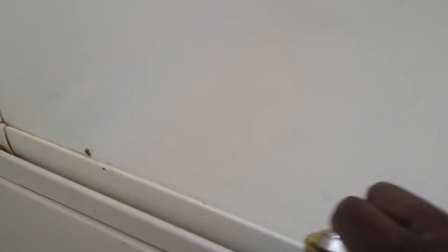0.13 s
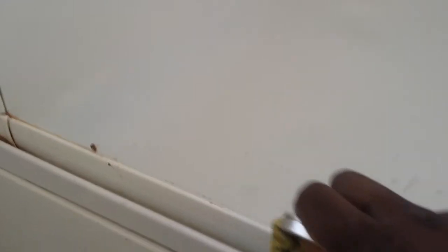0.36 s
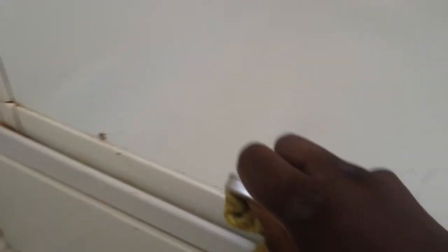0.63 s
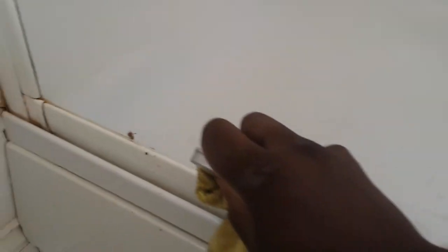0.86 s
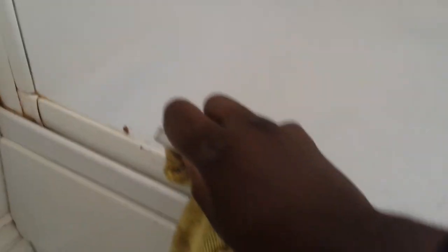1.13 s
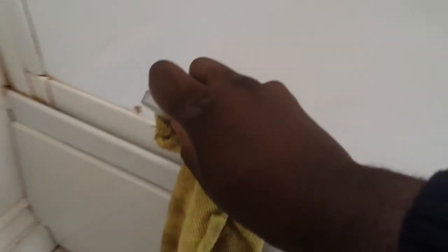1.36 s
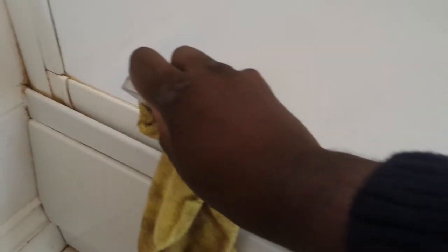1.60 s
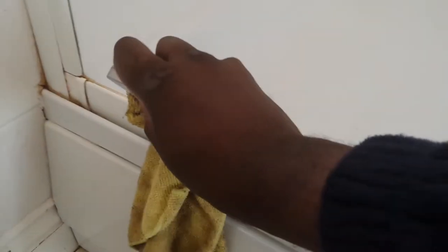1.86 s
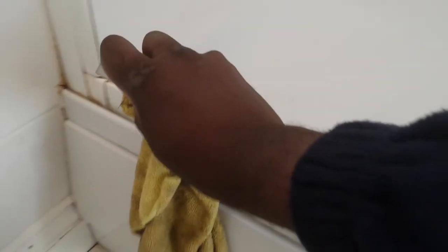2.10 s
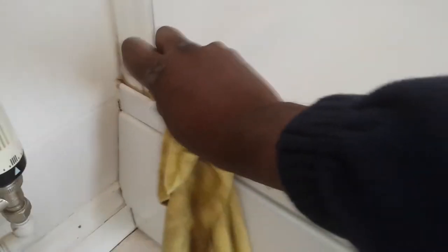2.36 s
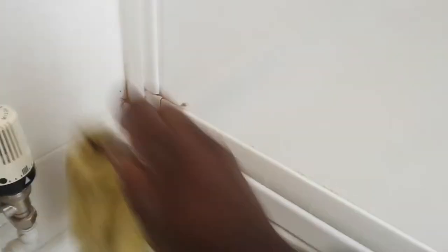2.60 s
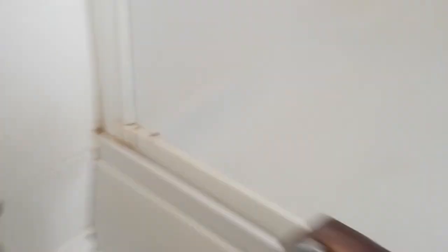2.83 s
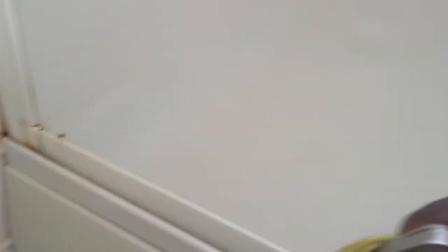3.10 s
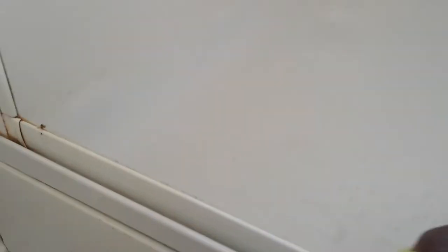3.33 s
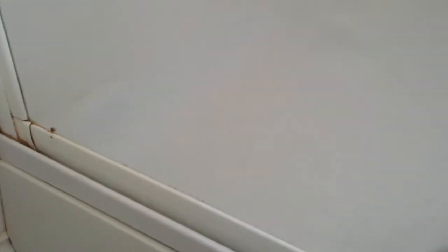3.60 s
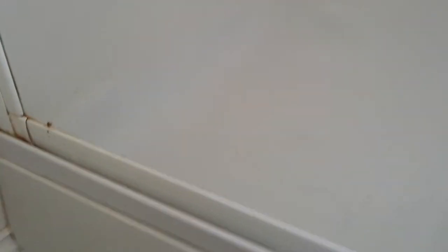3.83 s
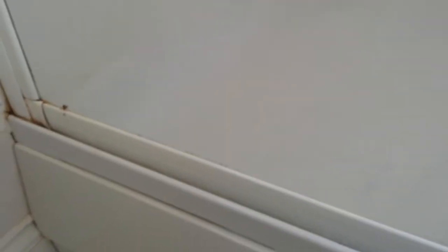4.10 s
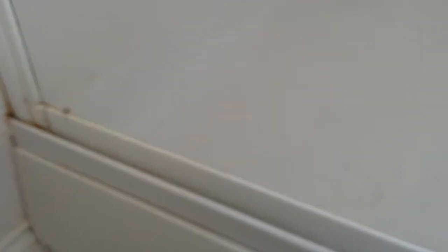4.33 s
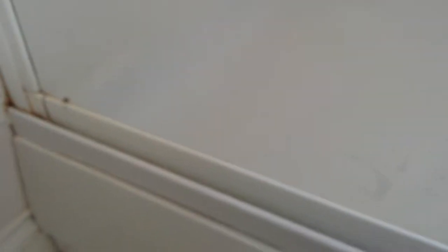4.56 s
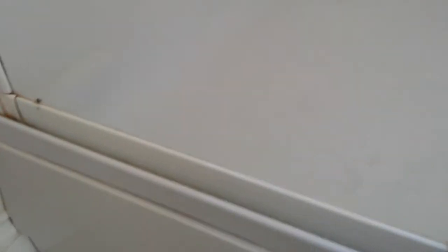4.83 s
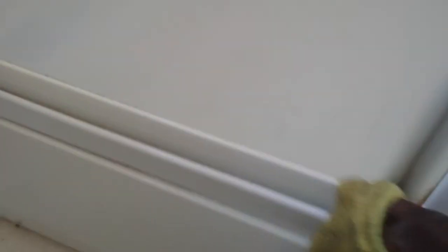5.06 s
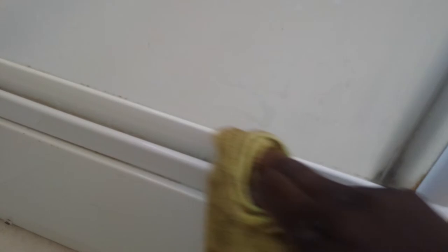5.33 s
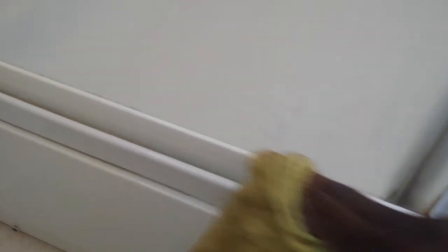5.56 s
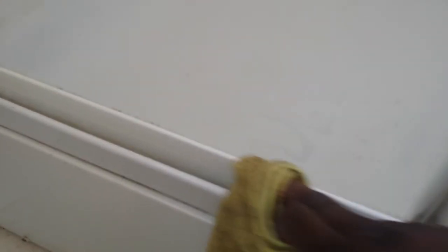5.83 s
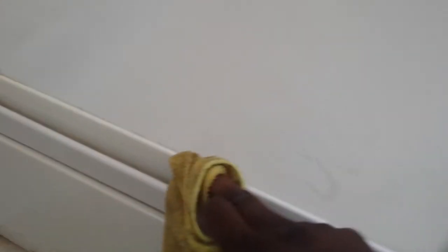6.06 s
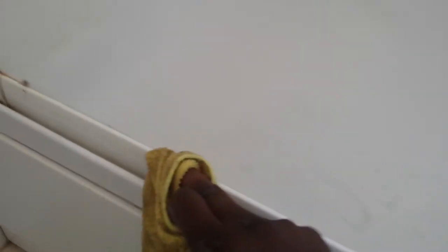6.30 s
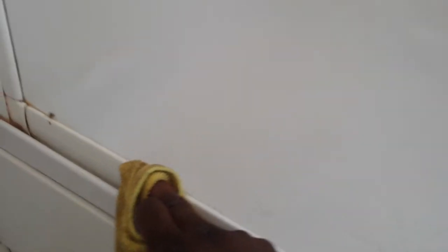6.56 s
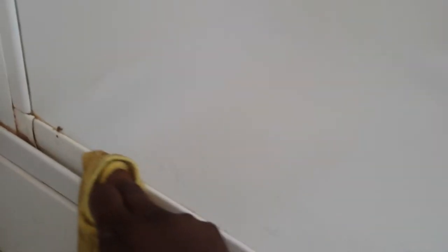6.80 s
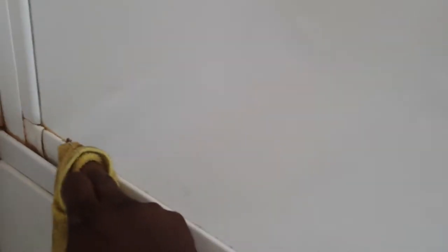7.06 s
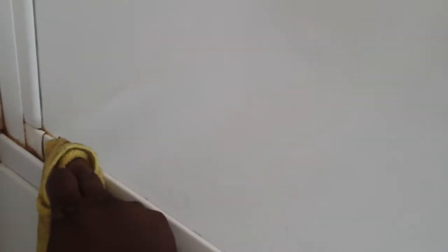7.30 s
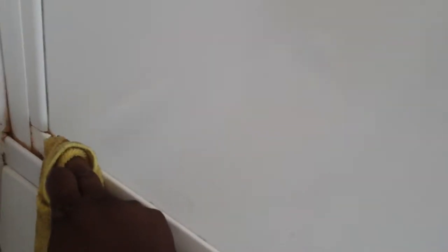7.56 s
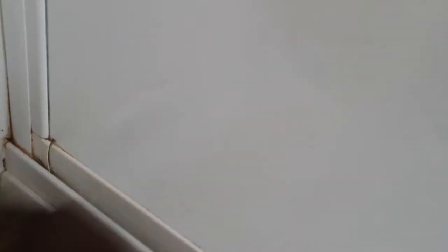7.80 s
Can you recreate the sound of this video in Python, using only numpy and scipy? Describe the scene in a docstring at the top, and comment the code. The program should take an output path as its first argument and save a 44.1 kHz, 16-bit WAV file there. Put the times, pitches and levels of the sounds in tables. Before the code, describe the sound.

A close stereo pickup in a small, quiet tiled bathroom with a faint bassy room bed. From 0 to 2.4 s a damp cloth around a hard tool drags along a hollow plastic rim: dry fibre hiss, soft rasp and uneven low judder, with small dull knocks near 0.9, 1.9 and 2.2 s. The rasp swells, and at 2.43 s the cloth slams off the corner with a loud clack and booming thuds until about 2.55 s. A brief squeak and loose cloth rustles follow, with a small dry tick near 3.35 s. At 4.23 s the bare tool falls, cracking sharply and bouncing brightly until 4.5 s, with short echoes. Quiet rustling leads to a second stroke from 5.8 to 7.2 s, finger-pressed, raspy and juddering, with faint high squeaks around 6.1 to 6.9 s. A muffled knock lands at 7.45 s, then light rustling and a faint low bump.

```python
"""A low judder, a rasp and a fibre hiss: a hand drags a damp cloth, wrapped round a small hard tool,
along the plastic rim of a shower tray. Uneven slips push the hollow tray; shaped noise rings rim and tool.
Knocks are bursts of noise over soft thuds; the bare tool falls and bounces, then a finger rubs the cloth.
Faint squeaks whistle, loose cloth rustles, and sparse echoes of a small tiled bathroom ring on.
Two microphone ports of unlike colour stand close by."""
import sys
import numpy as np
from scipy import signal
from scipy.fft import rfft, irfft
from scipy.io import wavfile
from scipy.ndimage import uniform_filter1d

SR = 44100
rng = np.random.default_rng(int(sys.argv[2]) if len(sys.argv) > 2 else 0)


def transcribe(u):
    """Save the signal u as a 16-bit wav file named by the first command-line argument.

    u: samples, shape (n,) or (channels, n), limited to [-1, 1]; the rate is SR.
    q: integer samples, one column per channel.
    """
    v = np.clip(np.atleast_2d(u).T, -1, 1)
    q = np.round(v * 32767).astype(np.int16)
    wavfile.write(sys.argv[1], SR, q)


def volts_from_db(level):
    """Convert decibel levels to linear amplitude ratios."""
    exponent = np.asarray(level, float) / 20
    return 10 ** exponent


N = 349272  # length [samples]

# modes of the hollow tray: (frequency [Hz], relative level [dB], t60 [s])
TRAY_MODES = [(50, -5.5, 0.6), (80, -3.5, 0.1), (120.7, 2, 0.31), (160, 2.5, 0.063), (204, 3, 0.085),
              (248, 0.5, 0.083), (289.6, -1, 0.13), (318, 0.5, 0.13), (362, 0.5, .09), (440, -1, 0.057)]
# modes of the plastic rim: (frequency [Hz], relative level [dB], t60 [s])
RIM_MODES = [(1262, 3, .12), (2320, 0, .055), (2440, -2, .055), (445, -2, .05), (490, -5, .05),
             (560, -2, .05), (636, -3, .05), (712, 2, .08), (850, -8, .03), (1500, -2, .04),
             (1900, -2, .03), (2130, -4, .04), (1680, -3, .04), (2640, 0, .04), (2850, 0, .04),
             (3100, 1, .04)]
# modes of the hard tool: (frequency [Hz], relative level [dB], t60 [s])
TOOL_MODES = [(4980, 3, .035), (5830, -7.5, .025), (5900, -8.5, .03), (6000, -2.5, 0.035), (6125, -3, .045),
              (6400, -3.5, .025), (6440, -0.5, .025), (6625, -2, .03), (6960, -4, .02), (6750, -2, .015),
              (7410, -2.5, .02), (7420, -1.5, .02), (7500, -2, .02), (8050, -2.5, 0.022), (8300, 3, 0.035),
              (8980, -10, 0.016), (9630, -7.5, .012)]
MUFFLED, BARE = 0.078, 1  # hardness 0-1 of a muffled blow, and of the bare tool


def evened(x):
    """Scales to rms 1."""
    return x / np.sqrt(np.mean(abs(x) ** 2) + 1e-20)


def peaked(x):
    """Scales to peak 1."""
    return x / abs(x).max()


def read(points, hz):
    """Reads a table on a log-frequency axis."""
    f, value = np.transpose(points)
    return np.interp(np.log(hz + 1), np.log(f + 1), value)


def add(mix, s, sound):
    """Mixes a sound in at time s."""
    part = mix[..., round(s * SR):][..., :sound.shape[-1]]
    part += sound[..., :part.shape[-1]]


def follow(table):
    """Gains of the dB columns of a curve, sample by sample; all but silent outside it."""
    s, *columns = np.transpose(table)
    return volts_from_db([np.interp(np.arange(N) / SR, s, c, -120, -120) for c in columns])


def wander(seconds):
    """Random drift of rms 1, smoothed over the given time."""
    span = round(seconds * SR)
    return evened(uniform_filter1d(uniform_filter1d(rng.standard_normal(N), span), span))


def resonate(x, hz, width):
    """A moving resonance of gain 1: shift down, smooth, shift back."""
    turn = np.exp(2j * np.pi * np.cumsum(hz * np.ones(len(x))) / SR)
    r = np.exp(-np.pi * width / SR)
    return 2 * (turn * signal.lfilter([1 - r], [1, -r], x / turn + 1e-18)).real


def resonate_twice(x, hz, width, second_width):
    """Two resonances in a row at one pitch give steeper skirts."""
    return resonate(resonate(x, hz, width), hz, second_width)


def ringing(modes, seconds, centre_hz, db_per_octave):
    """Answer of a body to one click; modes far from the centre of the blow are weaker."""
    t = np.arange(round(seconds * SR)) / SR
    hz, db, t60 = np.transpose(modes)[:, :, None]
    db = db - db_per_octave * abs(np.log2(hz / centre_hz))
    return (volts_from_db(db - 60 * t / t60) * np.sin(2 * np.pi * hz * t)).sum(0)


def tinted(x, modes, centre_hz, share):
    """Adds the share of a rubbing noise that rings a body."""
    body = ringing(modes, 0.33, centre_hz, 1.9)[None]
    return evened(x + share * evened(signal.oaconvolve(x, body, axes=1)[:, :N]))


def paired(a, b, hz):
    """Left and right spectra: alike in the bass, unrelated in the treble."""
    # diffuse sound: (frequency [Hz], left-right likeness [-1 to 1])
    likeness = [(60, 0.97), (150, 0.94), (380, 0.86), (940, 0.33), (2360, -0.02), (5910, 0.04),
                (14800, -0.01)]
    same = np.clip(read(likeness, hz), -1, 1)
    return np.array([a, same * a + np.sqrt(1 - same ** 2) * b])


def noise(spectra, patchy_db, flicker_db):
    """Diffuse two-channel noise with drifting patches and a shared flicker; its colour changes with the grip."""
    regrip_s = 4.2  # the tool is dropped; from here a finger presses the cloth
    frames, hz = N // 128 + 5, np.fft.rfftfreq(512, 1 / SR)
    a, b, c, d, patches = rng.standard_normal((5, frames, 257))
    patches = evened(uniform_filter1d(uniform_filter1d(patches, size=20, axis=0), size=7, axis=1))
    flicker = evened(uniform_filter1d(rng.standard_normal(frames), size=5))[:, None]
    tool, finger = (evened(volts_from_db(read(spectrum, hz))) for spectrum in spectra)
    colour = np.where(np.arange(frames)[:, None] * 128 / SR < regrip_s, tool, finger)
    z = paired(a + 1j * b, c + 1j * d, hz) * colour
    z = z * volts_from_db(patchy_db * patches + flicker_db * flicker)
    return evened(signal.istft(z, nperseg=512, noverlap=384, time_axis=1, freq_axis=2)[1][:, :N])


def still_room():
    """The quiet bed of the room: steady diffuse noise, strongest in the bass."""
    # colour of the still room: (frequency [Hz], density [dB per Hz])
    bed = [(15, -44.5), (25, 10), (159, -10.5), (577, -18), (678, -15.5), (796, -17), (1830, -24.5),
           (2040, -25), (3000, -20), (5210, -26), (10000, -40), (15200, -44)]
    return volts_from_db(-64.5) * noise((bed, bed), 0.84, .6)


def tiles(x):
    """Sparse echoes of random sign off the tiles, each band dying at its own speed."""
    # decay of the bathroom: (frequency [Hz], t60 [s])
    decay = [(80, 0.59), (260, 0.38), (700, 0.52), (1800, 0.41), (3200, 0.4), (6000, 0.33), (12000, 0.23)]
    taps = np.zeros((2, SR))
    at = np.arange(130, SR - 20, 20) + rng.integers(0, 20, (2, (SR - 131) // 20))
    np.put_along_axis(taps, at, rng.choice([-1., 1.], at.shape), 1)
    hz, t, z = signal.stft(taps, SR, nperseg=256)
    dying = volts_from_db(-60 * t / read(decay, hz)[:, None])
    tail = signal.istft(z * dying, SR, nperseg=256)[1][:, :SR]
    hz = np.fft.rfftfreq(SR, 1 / SR)
    bass_cut = np.hypot(1, (140 / (hz + 1)) ** 2)  # echoes thin in the bass; the tray carries the deep ring
    tail = irfft(paired(*rfft(tail), hz) / bass_cut)
    return signal.fftconvolve(x[None], tail / np.linalg.norm(tail[0]), axes=1)[:, :N]


def room(x):
    """Three sets of echo paths take turns, so the echoes stay varied and smooth."""
    turns_hz, echo_db = 3, -6.5
    turn = 2 * np.pi * turns_hz * np.arange(N) / SR
    paths = (tiles(x * np.sqrt(2 / 3) * np.cos(turn + 2 * np.pi * k / 3)) for k in range(3))
    return volts_from_db(echo_db) * sum(paths)


def squeak(seconds, hz, db):
    """A fuzzy, wavering whistle: noise through a narrow resonance that sinks a little."""
    sag, waver_share, width_hz = .02, .006, 200  # sag and waver are shares of the pitch
    n = round(seconds * SR)
    drive = rng.standard_normal((2, n))
    waver = evened(uniform_filter1d(rng.standard_normal(n), size=1500))
    hz = hz * (1 + waver_share * waver + sag * np.linspace(.5, -.5, n))
    whistle = evened(np.array([resonate_twice(d, hz, width_hz, 2 * width_hz) for d in drive]))
    return volts_from_db(db) * whistle * signal.windows.tukey(n, .6)


def squeaks():
    """Faint squeaks of damp cloth, each a whistle of its own pitch."""
    # whistles: (start [s], end [s], pitch [Hz], level [dB])
    whistles = [(2.674, 2.796, 5570, -53), (3.622, 3.68, 6200, -68), (6.06, 6.168, 7950, -63),
                (6.067, 6.415, 5650, -60), (6.246, 6.32, 7950, -60), (6.496, 6.62, 5600, -56),
                (6.553, 6.614, 7100, -52.5), (6.702, 6.924, 8300, -58), (6.705, 6.8, 5700, -52)]
    mix = np.zeros((2, N))
    for start, end, hz, db in whistles:
        add(mix, start, squeak(end - start, hz, db))
    return mix


def thud(db, hz, length, rung):
    """A soft push, its length in cycles, sets the tray booming by the share rung."""
    cycles = hz * np.arange(SR // 4) / SR
    push = -np.sin(2 * np.pi * cycles) * cycles * np.exp(-cycles / length)
    push = peaked(resonate_twice(push, hz, 1.5 * hz, 1.5 * hz))
    boom = signal.fftconvolve(push, ringing(TRAY_MODES, .4, hz, 6.0))[:len(push)]
    fade = signal.windows.tukey(2 * len(push), .3)[len(push):]
    return volts_from_db(db) * (push + rung * peaked(boom)) * fade


def bumps():
    """Dull, short low bumps on the tray, some under the falling tool."""
    # soft blows: (time [s], level [dB], centre [Hz])
    soft_blows = [(1.165, -21, 73.7), (2.486, -19, 129.4), (2.521, -18.5, 59.5), (2.538, -33, 117),
                  (2.715, -33.5, 323), (4.24, -19, 255), (4.32, -26.5, 352), (7.835, -36, 136),
                  (7.872, -55, 116), (7.9, -43, 109.5)]
    mix = np.zeros((2, N))
    for s, db, hz in soft_blows:
        add(mix, s, thud(db, hz, 0.88, 0.18))
    return mix


def clatter(modes, centre_hz, width, top, seconds, rung, db_per_octave):
    """Some ms of chatter give a broad band round the centre and ring the modes."""
    rise_share = .3  # share of the chatter in which it grows
    mode_scatter = .006  # each blow lands elsewhere and shifts the modes by about this share
    t = np.arange(SR // 4) / SR
    swell = np.exp(-(t / seconds) ** 2) * np.minimum(t / (rise_share * seconds), 1)
    chatter = rng.standard_normal((2, len(t))) * swell
    chatter = irfft(paired(*rfft(chatter), np.fft.rfftfreq(len(t), 1 / SR)), len(t))
    for _ in range(2):  # flatten the spectrum of the chatter so that every mode rings steadily
        z = rfft(chatter)
        chatter = irfft(z / abs(z), len(t)) * np.exp(-(t / (1.5 * seconds)) ** 4)
    width_hz = width * centre_hz
    band = [resonate_twice(c, centre_hz, width_hz, width_hz) for c in chatter]
    broad = np.array([resonate(b, centre_hz, 2 * width_hz) for b in band])
    broad = signal.lfilter(*signal.butter(2, 0.17 * centre_hz, "high", fs=SR), broad)
    broad = signal.lfilter(*signal.butter(2, min(top * centre_hz, SR / 2.1), fs=SR), broad)
    modes = np.array(modes) * (1 + mode_scatter * rng.standard_normal((len(modes), 1)) * [1, 0, 0])
    body = ringing(modes, 0.215, centre_hz, db_per_octave)[None]
    ring = signal.fftconvolve(chatter, body, axes=1)[:, :len(t)]
    sound = evened(broad) + rung * evened(ring)
    return evened(sound) * np.sqrt(seconds / t[-1] / 8)  # energy of a burst whose peak is near 1


def knock(hardness, chatter_ms, crack_db, crack_hz, clack_db, clack_hz, thud_db, thud_hz):
    """Chatter gives a high crack and a lower clack of the rim, ringing more when hard, over a thud."""
    # modes of a muffled crack: (frequency [Hz], relative level [dB], t60 [s])
    muffled_modes = [(4900, -6, 0.017), (5450, -1, .014), (6500, -4, .01)]
    seconds = chatter_ms / 1000
    crack_modes = TOOL_MODES if hardness > .5 else muffled_modes
    crack_ring, rim_ring = 0.68 + 1.2 * hardness, 0.39 + 0.75 * hardness
    crack = clatter(crack_modes, crack_hz, 2.0, 1.9, seconds, crack_ring, 17)
    clack = clatter(RIM_MODES, clack_hz, 1.1, 1.2, 1.1 * seconds, rim_ring, 26)
    return volts_from_db(crack_db) * crack + volts_from_db(clack_db) * clack + thud(thud_db, thud_hz, 0.51, 0.58)


def dry_tick():
    """One short, dry tick close to the microphone, sent to no echoes."""
    # (time [s], chatter [ms], crack level [dB], crack centre [Hz], clack level [dB], clack centre [Hz],
    # thud level [dB], thud centre [Hz])
    tick = (3.3475, 2, -34.5, 6300, -29, 2200, -48, 161)
    mix = np.zeros((2, N))
    add(mix, tick[0], knock(MUFFLED, *tick[1:]))
    return mix


def knocks():
    """Knocks on the rim: muffled ones of hand or wrapped tool, ringing off-centre ones as the tool falls bare."""
    # (time [s], chatter [ms], crack level [dB], crack centre [Hz], clack level [dB], clack centre [Hz],
    # thud level [dB], thud centre [Hz])
    blows = [(0.9341, 5.4, -48, 5200, -29, 2400, -37, 413), (0.944, 7.4, -48, 5200, -31.5, 1100, -34, 400),
             (1.859, 5, -35.5, 5200, -35, 1210, -46, 106), (2.219, 4.2, -28.5, 5200, -44, 600, -36.5, 139),
             (2.359, 9.3, -29, 5200, -40, 1660, -29, 200), (2.421, 11, -46, 5200, -27, 900, -27, 250),
             (2.4304, 6.8, -9, 5500, -10.5, 1880, -17, 141),
             (2.441, 10.5, -25, 5300, -15.5, 1920, -26, 250),
             (2.455, 10.4, -32.5, 5200, -20, 1900, -13.5, 315),
             (2.519, 13, -35.5, 5400, -24, 2000, -37, 250), (2.555, 9.8, -39.5, 5400, -35, 2012, -36, 250),
             (2.623, 6, -41.5, 5300, -42, 2000, -44, 252), (2.764, 4.9, -57, 5200, -32.5, 850, -43, 115),
             (2.795, 3.5, -44.5, 5200, -38, 1610, -44, 128), (3.556, 5.2, -54.5, 6200, -65, 2500, -49, 89),
             (4.148, 4.9, -51, 6800, -56.5, 2130, -57, 159),
             (4.2303, 7.2, -3, 7300, -12, 591.6, -18.5, 176),
             (4.2498, 2.8, -18.5, 8200, -21, 2204, -20, 267),
             (4.257, 6, -26.5, 6200, -22.5, 640, -24.5, 200), (4.281, 5.4, -5.5, 6300, -21, 2600, -36, 160),
             (4.305, 7.2, -30.5, 6000, -20.5, 2600, -37.5, 153),
             (4.401, 7.2, -35.5, 6800, -52, 2410, -44, 220),
             (4.4475, 6.7, -12.5, 7000, -9.5, 1280, -30.5, 160),
             (4.4722, 3.64, -4.5, 7000, -10.5, 2700, -36.5, 402),
             (4.5, 9.9, -26, 6000, -21, 1400, -33, 278), (7.452, 6.3, -36, 4900, -24, 2350, -31.5, 290),
             (7.472, 5, -47, 4900, -32, 1190, -35, 280)]
    drop_start_s, drop_end_s = 4.2, 4.51  # the bare tool falls and bounces
    drop_pan_db = -2  # left against right
    mix = np.zeros((2, N))
    for s, *blow in blows:
        falling = drop_start_s < s < drop_end_s
        pan = volts_from_db(falling * drop_pan_db * np.c_[[.5, -.5]])
        add(mix, s, knock(BARE if falling else MUFFLED, *blow) * pan)
    return mix


def rustling():
    """Rasp, hiss and rumble gains of the loose cloth brushing past: each rustle swells, peaks and fades."""
    # (start [s], length [s], rasp level [dB], fibre hiss level [dB], rumble level [dB],
    # place of the peak [share of the length])
    brushes = [(2.653, 0.2, -59, -57.5, -59, 0.32), (2.839, 0.63, -53, -53.5, -52, 0.42),
               (3.41, 0.18, -60.5, -67, -53, 0.61), (3.539, 0.16, -58.5, -60.5, -56, 0.5),
               (3.668, 0.55, -49, -52, -53.5, 0.46), (4.55, 0.37, -58.5, -63, -80, 0.55),
               (4.981, 0.53, -70, -68, -83, 0.62), (5.243, 0.32, -55.5, -65, -67, 0.66),
               (5.531, 0.25, -52, -55.5, -54, 0.66), (7.549, 0.32, -55.5, -56, -60.5, 0.67),
               (7.814, 0.14, -57, -53.5, -49, 0.48)]
    edge_db = 14  # softness of a rustle's ends
    gains = np.zeros((3, N))
    for start, length, *levels_db, top in brushes:
        bend = np.log(.5) / np.log(np.clip(top, .1, .9))  # moves the peak to its place
        u = np.linspace(1e-3, 1 - 1e-3, round(length * SR)) ** bend
        add(gains, start, volts_from_db(np.c_[levels_db] + edge_db * np.log10(np.sin(np.pi * u))))
    return gains


def sway():
    """Deep rumble of the moving arm and cloth: noise round 45 Hz."""
    return evened(resonate_twice(rng.standard_normal(N), 45, 100, 100))


def judder(force, drag_gain):
    """The cloth sticks and slips unevenly and pushes the hollow tray, over a wandering drag rumble."""
    slips_hz, slips_wander_db, drag_wander_db = 184.6, 1.37, 2.5
    hz = slips_hz * volts_from_db(slips_wander_db * wander(.04))
    wobble = evened(uniform_filter1d(rng.standard_normal(N), size=500))
    slips = np.diff(np.floor(np.cumsum(hz * volts_from_db(2.5 * wobble)) / SR), prepend=0)  # one click a slip
    slips = evened(slips * volts_from_db(2.7 * rng.standard_normal(N))) + 0.79 * rng.standard_normal(N)
    push = evened(resonate_twice(slips, hz, 220, 260))
    boom = evened(signal.oaconvolve(push, ringing(TRAY_MODES, .12, 240, 1.4))[:N])
    push = 0.78 * push + boom  # the hand damps the ring
    push /= np.sqrt(uniform_filter1d(push ** 2, size=9000) + 1e-9)  # the hand keeps its mean force
    drag = evened(resonate(resonate(rng.standard_normal(N), 100, 82), 96, 130))
    return force * push + drag_gain * volts_from_db(drag_wander_db * wander(0.058)) * drag


def rub():
    """Judder, rasp coloured by rim and runner, and fibre hiss follow strokes and rustles."""
    # two long strokes along the rim; the first ends as the cloth slams off the corner:
    # (time [s], judder level [dB], drag rumble level [dB], rasp level [dB], fibre hiss level [dB])
    strokes = [
        [(0.0, -33, -41, -47.5, -50.5), (0.28, -48.5, -39.5, -54, -48.5), (0.5, -40.5, -42, -51, -50),
         (0.66, -33.5, -37, -49, -48.5), (0.79, -36, -58, -49.5, -47.5), (0.9, -33, -45.5, -48.5, -48),
         (1.1, -41.5, -41, -52.5, -49.5), (1.4, -55, -39, -52.5, -48), (1.55, -36, -39.5, -52, -46.5),
         (1.75, -34.5, -39, -46.5, -45.5), (1.93, -49, -41.5, -43, -44.5), (2.2, -40, -35.5, -40, -41.5),
         (2.41, -41.5, -33, -42, -43.5), (2.47, -37, -21.5, -22.5, -48), (2.56, -28.5, -31.5, -33, -50),
         (2.68, -42, -38, -44.5, -58), (2.86, -75.5, -54, -69, -78)],
        [(5.77, -61, -59, -57, -72), (5.82, -52, -49, -52, -50.5), (5.88, -41, -65, -50.5, -55.5),
         (5.99, -43, -49, -42, -50.5), (6.11, -42, -45.5, -47, -50.5), (6.26, -39, -41.5, -44.5, -49),
         (6.48, -47, -45.5, -43.5, -47.5), (6.6, -40.5, -51, -41, -47), (6.76, -40.5, -46, -41.5, -46),
         (6.9, -46.5, -43.5, -41, -45), (7.02, -44.5, -52, -46.5, -51.5), (7.15, -42.5, -60, -49.5, -52),
         (7.26, -63, -52, -55, -56), (7.44, -76, -57, -64, -65), (7.6, -64, -53, -59, -62)],
    ]
    # colours of the rasp, with the tool, then with the finger: (frequency [Hz], density [dB per Hz])
    rasp_colours = [(210, -36), (350, -8), (537, -6.5), (926, -8.5), (997, -7), (1330, -11), (3000, -9.5),
                    (4500, -14.5), (5850, -50.5), (9900, -120)], [(210, -26.5), (350, -8), (520, -13.5),
                    (760, -8), (1020, -11.5), (1420, -16), (1810, -16.5), (4500, -23), (5850, -55),
                    (9900, -120)]
    # colours of the fibre hiss, with the tool, then with the finger: (frequency [Hz], density [dB per Hz])
    hiss_colours = [(1470, -17.5), (2500, -8), (3910, 0), (5090, -2.5), (6890, -3), (8450, -8), (9610, -12),
                    (14300, -16), (15200, -20)], [(1470, -32.5), (2500, -1), (2740, -12), (3430, 1.5),
                    (4310, -4.5), (5570, -2.5), (7490, -4), (8200, -5), (15200, -16)]
    # metal door runner, sings under the stroke: (frequency [Hz], relative level [dB], t60 [s])
    runner_modes = [(1005, 0, .35), (1127, -2, .35)]
    force, drag, *rim = sum(follow(stroke) for stroke in strokes)
    *loose, rumble = rustling()
    # the hand's pressure wavers by 1 dB; fibres catch in quick, uneven grains
    unsteady_db = 1 * wander(0.024) + .7 * wander(.002)
    rasp_gain, hiss_gain = np.add(rim, loose) * volts_from_db(unsteady_db)
    rasp = tinted(noise(rasp_colours, 1.2, 0.8), RIM_MODES, 700, 0.11)
    rasp = tinted(rasp, runner_modes, 910, 0.25)
    hiss = tinted(noise(hiss_colours, 1.3, 0.23), TOOL_MODES, 6500, 0.028)
    tray = judder(force + volts_from_db(-4) * loose[0], drag)  # rustles judder 4 dB below their rasp
    return tray + rumble * sway(), rasp_gain * rasp + hiss_gain * hiss


def scene():
    """Strokes, squeaks, knocks and bumps, the echoes of tray and blows, and the still room."""
    tray, cloth = rub()
    blows = knocks() + bumps()
    close = cloth + dry_tick() + squeaks()
    echoes = room(blows.sum(0) + tray)
    return tray + close + blows + echoes + still_room()


def top_cut(x):
    """Nothing passes above the cut-off."""
    return signal.sosfilt(signal.butter(12, 15390, fs=SR, output="sos"), x)


def record(dry):
    """Each microphone port has its own colour; then a bass cut and hard overload."""
    # difference of the ports: (frequency [Hz], left over right [dB])
    port_colour = [(60, -4), (92, 1), (140, -6.5), (210, 5), (330, 1), (500, 2.5), (760, -2), (1160, -2),
                   (1780, -5), (2720, 1), (4150, 6.5), (6340, 1), (9680, -13.5), (14800, -6.5)]
    # colour of both ports: (frequency [Hz], gain [dB])
    shared_colour = [(780, 0), (1000, -3.5), (1250, -0.5), (2500, 0), (3150, -3), (3450, -4.5),
                     (3850, -4.5), (4250, -4), (4700, 0.5), (5300, 2.5), (6000, 4), (8500, 3), (9300, -1),
                     (15000, 2.5)]
    edge_hz, low_cut_hz = 15500, 31
    hz = np.fft.rfftfreq(1024, 1 / SR)
    colour_db = np.outer([.5, -.5], read(port_colour, hz)) + read(shared_colour, hz)
    colour = volts_from_db(colour_db) * (hz < edge_hz)
    taps = np.roll(irfft(colour), 512, axis=1) * np.hanning(1024)
    heard = signal.oaconvolve(dry, taps, "same", axes=1)
    heard = signal.lfilter(*signal.butter(1, low_cut_hz, "high", fs=SR), heard)
    return top_cut(np.clip(heard, -1, 1))


dry = scene()
out = record(dry)
transcribe(out)
```